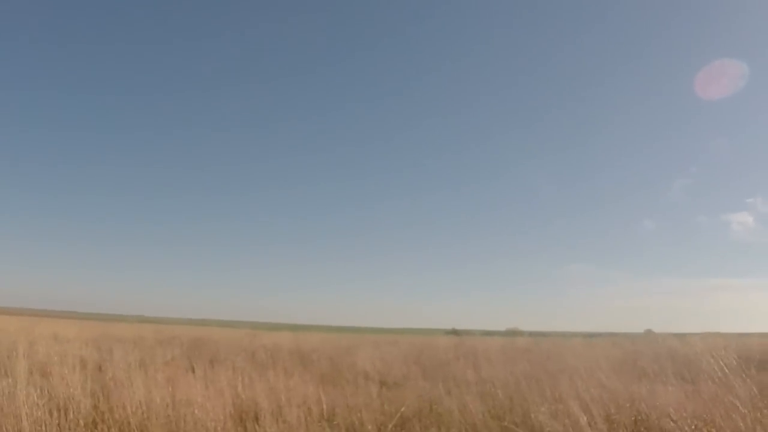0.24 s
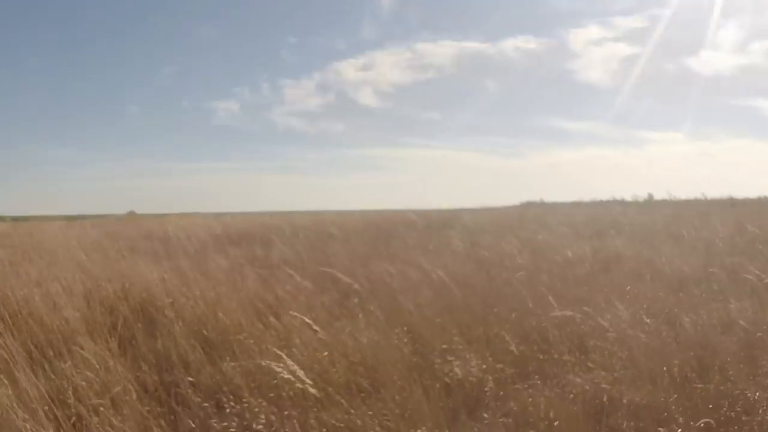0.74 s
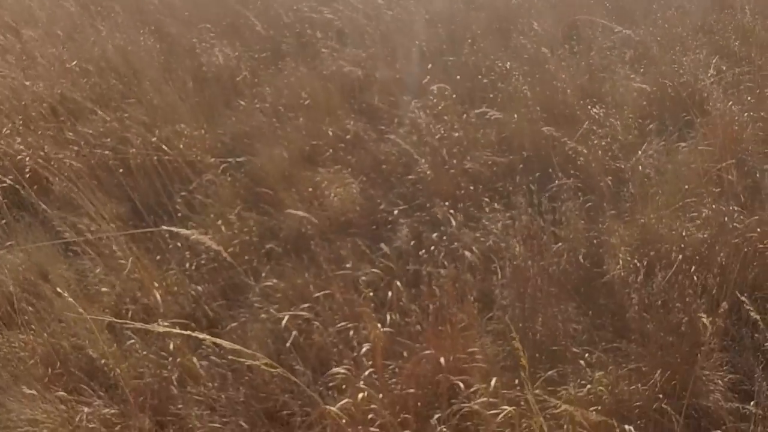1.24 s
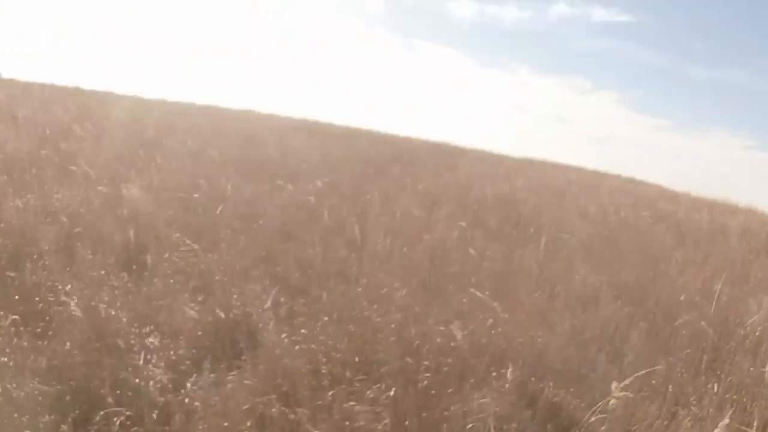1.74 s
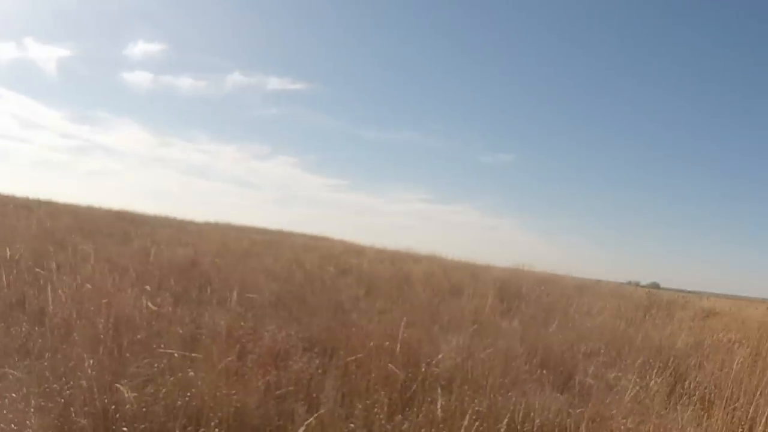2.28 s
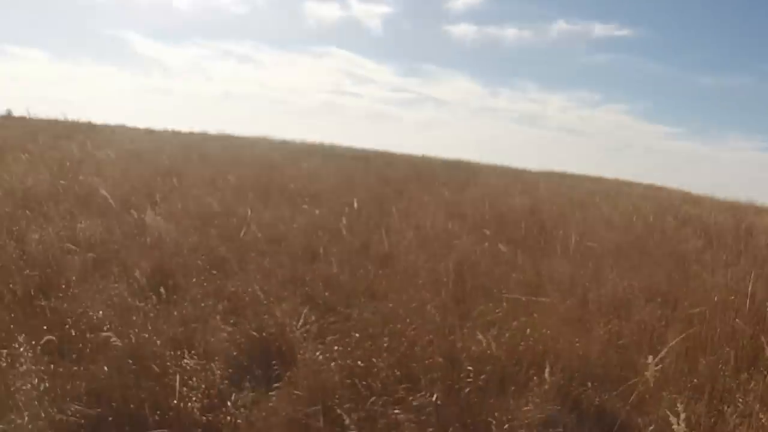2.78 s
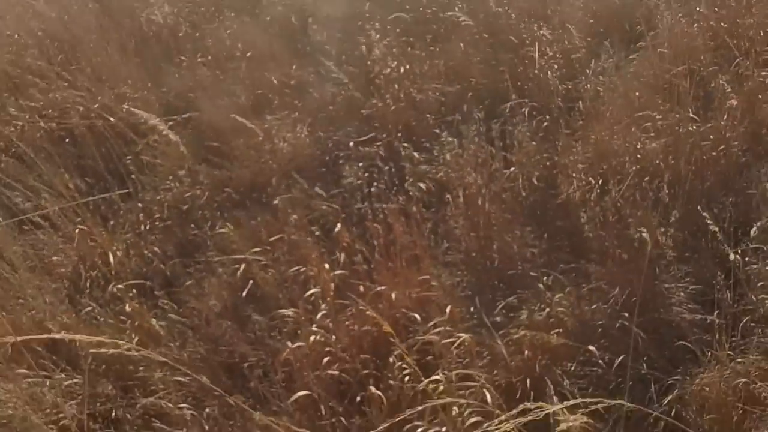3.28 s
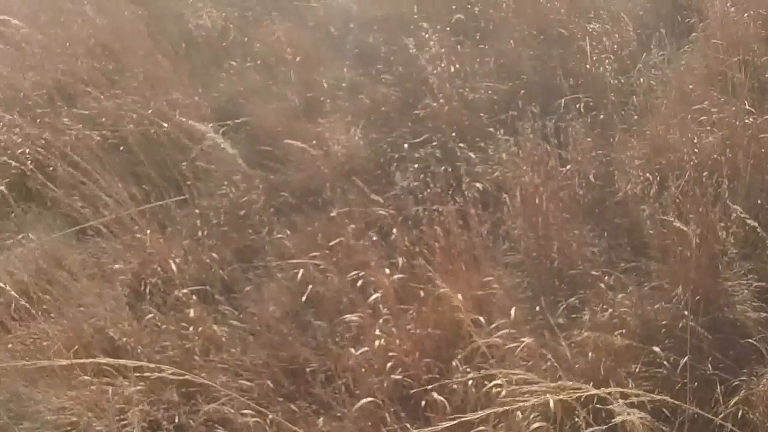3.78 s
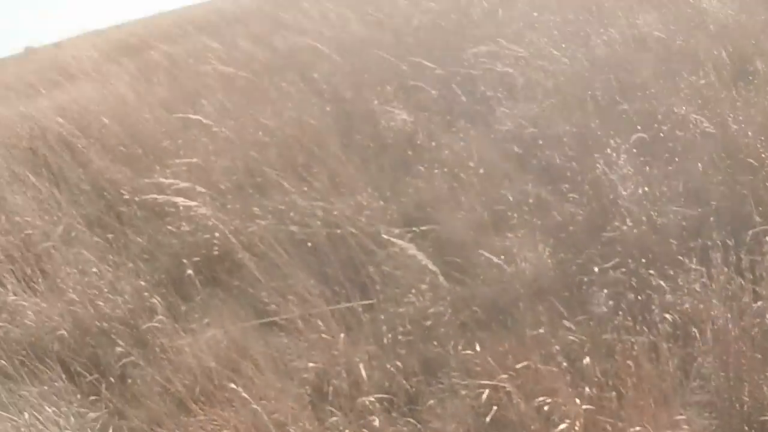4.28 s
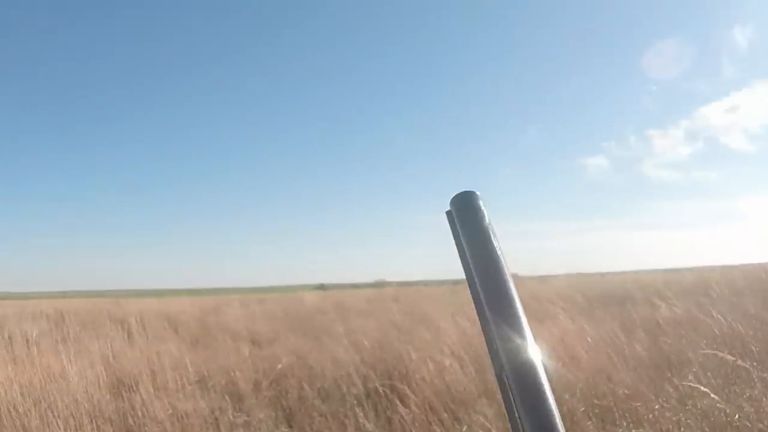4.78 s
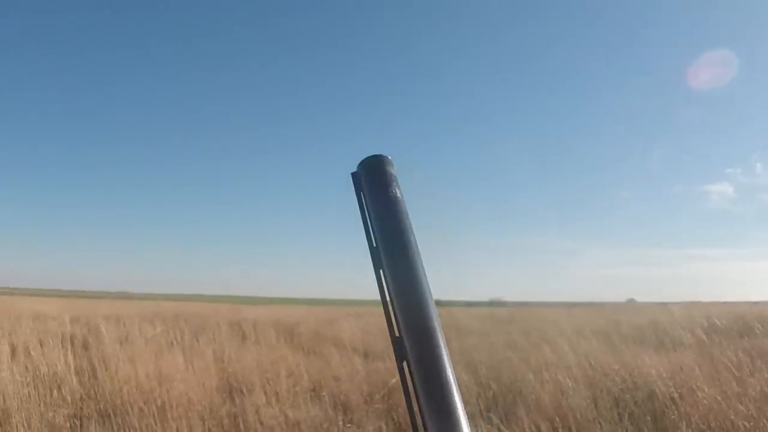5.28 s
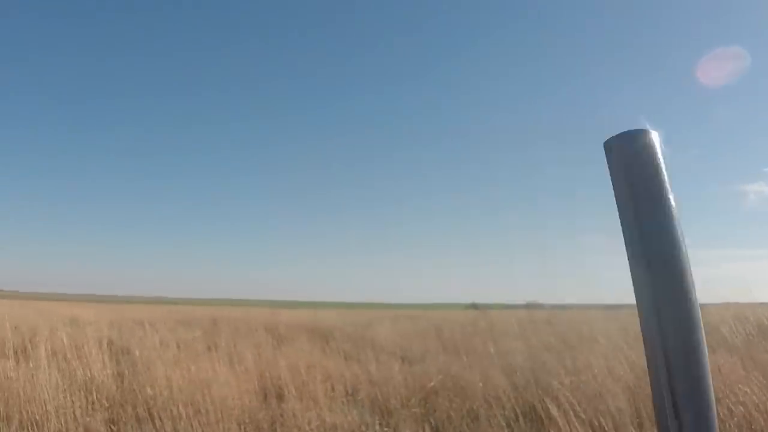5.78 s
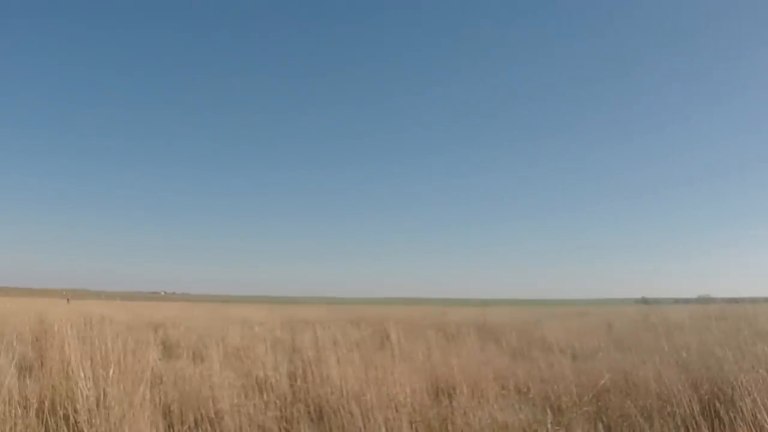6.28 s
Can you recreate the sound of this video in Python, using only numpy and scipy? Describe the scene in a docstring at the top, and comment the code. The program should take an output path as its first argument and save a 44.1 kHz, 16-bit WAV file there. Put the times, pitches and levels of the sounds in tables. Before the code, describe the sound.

A shotgun is loaded close up with steel clicks, a short squeak and a sharp closing snap, over gusty wind and hissing dry grass.

```python
"""Loading a shotgun in windy grass

Someone stands in tall dry grass in an open field and handles a shotgun close to a body-worn camera.
Clothes scuff, a shell scrapes and squeaks into the steel chamber, and the action clicks and snaps shut.
Gusts rumble on the microphone, hiss in the grass and sound a hollow note in the camera housing."""
import sys
import numpy as np
from scipy import signal
from scipy.fft import rfft, irfft
from scipy.io import wavfile
from scipy.ndimage import uniform_filter1d

SR = 44100
rng = np.random.default_rng(int(sys.argv[2]) if len(sys.argv) > 2 else 0)


def store_wav(level_fs):
    """Save 16-bit WAV to argv[1]."""
    pcm = np.round(np.clip(np.atleast_2d(level_fs), -1, 1) * 32767)
    wavfile.write(sys.argv[1], SR, pcm.T.astype(np.int16))


N = 288344
FREQS = np.fft.rfftfreq(N, 1 / SR)

# gusts: crest t/s, length/s, microphone rumble/dB, grass hiss/dB, hollow housing note/dB
GUSTS = [(0.01, 0.18, -54, -60, -64), (0.333, 0.11, -51, -65, -72), (0.703, 0.16, -47, -61.5, -68),
         (0.826, 0.097, -51, -66, -57.5), (1.309, 0.08, -55, -66, -61), (1.467, 0.13, -50, -70, -68),
         (1.697, 0.24, -48, -61.5, -62), (1.979, 0.11, -50, -62, -61), (2.328, 0.13, -52, -60, -54.5),
         (2.631, 0.21, -49, -61, -59), (3.035, 0.084, -48, -66, -56), (3.248, 0.072, -51.5, -83, -77),
         (4.34, 0.11, -62, -66, -73), (4.75, 0.1, -56, -66, -86), (4.992, 0.051, -46.5, -59.5, -64),
         (5.136, 0.053, -54, -61, -59), (5.305, 0.19, -50.5, -57, -60), (5.78, 0.19, -45.5, -59, -61.5),
         (6.037, 0.2, -51.5, -57.5, -59.5), (6.226, 0.18, -41, -56, -60),
         (6.465, 0.17, -45.5, -58.5, -56.5)]
# modes of the steel action and barrel: f/Hz, width/Hz, level/dB
STEEL_MODES = [(1310, 49, -21), (1570, 59, -2.5), (1980, 500, -5.5), (2640, 190, -5.5), (3090, 170, -7),
               (3605, 190, -2.5), (4540, 300, -5.5), (4990, 340, -13.5), (5710, 230, -10),
               (6120, 130, -5.5), (7180, 510, 4), (7830, 110, 5.5), (8540, 180, -12), (8990, 280, -4),
               (9600, 300, -5), (10700, 350, -12), (12600, 1000, -10)]


def amp(db):
    """Decibels to gain."""
    return 10 ** (np.asarray(db) / 20)


def unit(x):
    """Scales to rms 1."""
    return x / np.sqrt(np.mean(abs(x) ** 2) + 1e-20)


def colour(points, hz):
    """Gain of an EQ curve (f/Hz, level/dB) on a log-frequency axis."""
    f, db = np.transpose(points)
    return amp(np.interp(np.log(hz + 1), np.log(f), db))


def peaks(modes, hz):
    """Gain of a bank of resonances."""
    return np.sqrt(sum(amp(db) ** 2 / (1 + ((hz - f) / width) ** 2 * 2) ** 2 for f, width, db in modes))


def noise(gain, size=N):
    """Noise of rms 1 with the given spectrum."""
    return unit(irfft(rfft(rng.standard_normal(size)) * gain, size))


def wander(hz):
    """Random modulation of rms 1, rolling off above hz."""
    return noise(1 / (1 + (FREQS / hz) ** 4))


def steadied(x, seconds):
    """Evens out the slow swells of a noise."""
    power = abs(uniform_filter1d(x ** 2, max(int(seconds * SR), 2)))
    return x / np.sqrt(power + 0.034)


def causal(gain):
    """The minimum-phase spectrum: the quickest ring that has this gain."""
    cepstrum = irfft(np.log(gain + 1e-9))
    half = len(cepstrum) // 2
    return np.exp(rfft(np.r_[cepstrum[0], 2 * cepstrum[1:half], np.zeros(half)]))


def add(mix, s, sound):
    """Mixes a sound in at s seconds."""
    part = mix[max(round(s * SR), 0):][:len(sound)]
    part += sound[:len(part)]


def swells(base, rows, steepness=2.58, linger=1.08):
    """Adds swells (crest t/s, length/s, level/dB) to a gain by power; each falls slower than it rises."""
    power = base ** 2
    for crest, seconds, db in rows:
        start = max(crest - 2 * seconds, 0)
        offset = (np.arange(start, crest + 2 * seconds, 1 / SR) - crest) / (seconds / 2)
        flank = abs(np.where(offset > 0, offset / linger, offset))
        add(power, start, amp(db) ** 2 * np.exp(-flank ** steepness))
    return np.sqrt(power)


def field_air(db=-60, low_cut_hz=180):
    """A steady bed of air over the field."""
    # tone of the air: f/Hz, level/dB
    air_eq = [(59, -26), (100, 1), (159, -4.5), (192, -1.5), (293, -7), (355, -8.5), (420, -10.5),
              (640, -13.5), (697, -14.5), (758, -15), (1690, -22.5), (3610, -25.5), (5870, -28),
              (14200, -41.5), (15500, -54)]
    return amp(db) * noise(colour(air_eq, FREQS) * FREQS ** 2 / (FREQS ** 2 + low_cut_hz ** 2))


def breeze():
    """The breeze between gusts, in dB for every sample, with a lull around 4 s."""
    # breeze envelope: t/s, level/dB
    breakpoints = [(0, -52), (1.1, -56), (1.6, -53.5), (2.9, -53), (3.7, -60.5), (4.2, -63.5), (4.8, -60),
                   (5.1, -48.5), (5.55, -50.5), (6.54, -55.5)]
    return np.interp(np.arange(N) / SR, *np.transpose(breakpoints))


def grass(bed_db, hiss_db=1, fizz_db=-4, ticks_per_s=700, tick_share=0.59):
    """Gusts hiss through dry stalks that tick against each other; strong gusts are brighter."""
    # tone of the dry grass: f/Hz, level/dB
    hiss_eq = [(200, -2), (500, -3), (850, 1.5), (1200, 2.5), (1600, 0), (1950, -2), (2300, 2), (2700, -3),
               (3200, -9.5), (4200, -13), (5500, -17.5), (8000, -35), (16000, -34.5)]
    tone = colour(hiss_eq, FREQS)
    gust = swells(amp(bed_db), [(s, seconds, db) for s, seconds, _, db, _ in GUSTS])
    ticks = (rng.random(N) < ticks_per_s / SR) * rng.standard_normal(N)
    stalks = unit(irfft(rfft(ticks) * tone, N))
    hiss = unit(noise(tone) + tick_share * stalks) * gust
    fizz = noise(peaks([(2400, 500, 6.5), (3700, 840, -4)], FREQS)) * gust ** 2 / gust.max()
    return amp(hiss_db) * hiss + amp(fizz_db) * fizz


def housing_note(bed_db, trim_db=-1):
    """Wind blows a hollow note in the cavity of the camera housing."""
    # cavity modes: f/Hz, width/Hz, level/dB
    cavity_modes = [(1560, 144, 3.5), (1672, 290, 1)]
    blown = swells(amp(bed_db), [(s, seconds, db) for s, seconds, _, _, db in GUSTS])
    return amp(trim_db) * steadied(noise(peaks(cavity_modes, FREQS)), 0.032) * blown


def microphone_wind(buffet_db=1.0, flutter_db=1.0, surge_db=1.74):
    """Eddies on the microphone: slow buffeting under a fluttering rumble."""
    # tone of the sub-bass buffeting and of the rumble: f/Hz, level/dB
    buffet_eq = [(10, -16.5), (22, -8.5), (36, 2), (55, -9.5), (75, -15), (150, -25.5), (400, -75)]
    rumble_eq = [(30, -21), (62, 0), (110, 1), (155, -4), (185, -12.5), (250, -13), (380, -22), (700, -33),
                 (1500, -53), (5000, -74)]
    # large eddies that thump the microphone: crest t/s, length/s, level/dB
    eddies = [(0, 0.035, -39), (0.314, 0.052, -44.5), (0.876, 0.16, -45), (1.166, 0.05, -47),
              (2.04, 0.045, -47), (2.358, 0.19, -45.5), (3.096, 0.036, -42.5), (4.855, 0.16, -43.5),
              (4.994, 0.035, -37), (5.364, 0.054, -40), (6.227, .1, -44), (6.427, 0.061, -47.5)]
    pressure = swells(amp(breeze()), [(s, seconds, db) for s, seconds, db, _, _ in GUSTS])
    pressure *= amp(surge_db * wander(8.6))
    buffet = steadied(noise(colour(buffet_eq, FREQS)), 0.074) * swells(pressure * amp(-2.5), eddies)
    rumble = unit(noise(colour(rumble_eq, FREQS)) * amp(flutter_db * wander(40)))
    return amp(buffet_db) * buffet + steadied(rumble, 0.061) * pressure


def scuff(db, decay, tilt_db, rise=0.0014, grain_db=1.5, size=8192):
    """A short brush of cloth: grainy noise that holds briefly and dies."""
    # tone of rubbing cloth: f/Hz, level/dB
    cloth_eq = [(200, -47), (600, -4), (1200, -7.5), (1550, 4), (2200, 0), (2900, -6.5), (3550, -0.5),
                (4100, -9), (4700, -7), (5600, -18.5), (6500, -15.5), (7400, -38), (16000, -47)]
    t, hz = np.arange(size) / SR, np.fft.rfftfreq(size, 1 / SR)
    rub = noise(colour(cloth_eq, hz) * amp(tilt_db * np.log2((hz + 1) / 2000)), size)
    grain = amp(grain_db * noise(1 / (1 + (hz / 300) ** 2), size))
    envelope = np.minimum(t / rise, 1) / np.sqrt(1 + (t / decay) ** 4)
    return amp(db) * unit(rub * grain) * envelope


def jolt(hz=34.4, db=-30, rise=0.0057, decay=0.0403):
    """The closing action shakes the camera: a few slow swings on its mount."""
    t = np.arange(SR // 2) / SR
    return amp(db) * np.sin(2 * np.pi * hz * t) * (1 - np.exp(-t / rise)) * np.exp(-(t / decay) ** 2)


def slide(seconds, db, pitch_hz, upper_db, scrape_db, waver=0.0071, glide=0.0045, judder_db=1, size=4096):
    """Stick and slip make the chamber squeak, rising slightly, over its upper modes and a dry scrape."""
    # upper modes of the squeak: f/Hz, width/Hz, level/dB
    upper_modes = [(6530, 90, -9.5), (9230, 130, 1), (9900, 400, -13)]
    scrape_eq = [(500, -27), (1500, -9), (5000, 10.5), (7000, -10.5), (13000, -6), (16000, -11)]
    t, hz = np.arange(size) / SR, np.fft.rfftfreq(size, 1 / SR)
    drift, judder = (noise(1 / (1 + (hz / 190) ** 4), size) for _ in range(2))
    bend = 1 + waver * drift + glide * (t / seconds - .5)
    phase = 2 * np.pi * np.cumsum(pitch_hz * bend) / SR
    squeak = unit(np.sin(phase) + amp(-28) * np.sin(2 * phase) + amp(-29) * np.sin(3 * phase))
    upper = steadied(noise(peaks(upper_modes, hz), size), 0.012)
    scrape = noise((peaks(STEEL_MODES, hz) + 0.29) * colour(scrape_eq, hz), size)
    stroke = signal.windows.tukey(min(int(seconds * SR), size), .8)
    sound = (squeak + amp(upper_db) * upper + amp(scrape_db) * scrape) * amp(judder_db * judder)
    return amp(db) * stroke * sound[:len(stroke)]


def rattle(seconds, db, sizzle_db, per_s=170, jitter=0.75, notes_hz=(3000, 5240), spread_db=3):
    """A quick, uneven run of light contacts between loose parts."""
    out = np.zeros(SR // 4)
    contacts = rng.uniform(-1, 1, (max(round(seconds * per_s), 1), 3))
    for k, (late, note, softness) in enumerate(contacts):
        note_hz = np.interp(note, [-1, 1], notes_hz)
        tick = click(note_hz, db - spread_db * softness, ring_db=0, sizzle_db=sizzle_db, decay=.002)
        add(out, (k + jitter * late) / per_s, tick)
    return out


def click(note_hz, db, ring_db, sizzle_db, decay,
          rise=0.00074, tail=0.015, tail_db=-31, lag=0.001227, size=4096):
    """Steel parts chatter for a few milliseconds and ring the action; the treble arrives first."""
    t, hz = np.arange(size) / SR, np.fft.rfftfreq(size, 1 / SR)
    envelope = (1 - np.exp(-t / rise)) * (np.exp(-(t / decay) ** 1.45) + amp(tail_db) * np.exp(-t / tail))
    chatter = rfft(rng.standard_normal(size) * envelope)
    chatter *= causal(uniform_filter1d(abs(chatter) ** 2, size=60) ** -.5)  # flattened, so unpitched
    modes = STEEL_MODES + [(note_hz, 170, 8)]  # the struck part adds its own note
    ring = chatter * causal(peaks(modes, hz) + amp(-16))
    knock_db = -6.5 * np.log2(note_hz / 1900)  # higher-pitched parts knock less
    snap_db = 0.28 * sizzle_db
    contact_eq = [(150, knock_db - 30), (900, knock_db - 10.5), (1400, knock_db), (2000, knock_db),
                  (2700, 0), (3900, 0), (4500, ring_db), (5200, ring_db), (6200, snap_db - 1.5),
                  (9400, snap_db - 6.5), (11000, sizzle_db + 0.5), (15000, sizzle_db - 10)]
    broad = np.sqrt(uniform_filter1d(abs(ring) ** 2, size=170))
    ring *= causal(colour(contact_eq, hz) / broad)  # the contact, not the modes, sets the broad colour
    delay = lag / (1 + (hz / 3000) ** 2)  # bending waves: low notes travel slower
    sound = irfft(ring * np.exp(-2j * np.pi * np.cumsum(delay) * SR / size))
    return amp(db) * sound[:size // 2]


def widen(mix, delay=.007):
    """Centres the mix, with a trace of stereo width above the bass."""
    # side against centre: f/Hz, level/dB
    side_eq = [(30, -61.5), (150, -42.5), (500, -39), (4000, -33), (14000, -25)]
    side = np.zeros(N)
    add(side, delay, irfft(rfft(mix) * colour(side_eq, FREQS), N))
    return np.array([mix + side, mix - side])


def scene(breeze_follow=.52, flutter_db=1.97, slide_trim_db=1):
    """Lays the cloth and gun foley over the wind bed."""
    # clothes and stalks brushing: t/s, level/dB, decay/s, tilt/(dB per octave)
    scuffs = [(.134, -58, 0.013, 7), (.629, -54, 0.018, 5), (.836, -56, 0.02, -3.5),
              (.981, -44, 0.022, 0.5), (1.455, -54, 0.021, 0.5), (1.7496, -42.5, 0.017, -0.8),
              (1.938, -55, 0.013, -5), (1.973, -52.5, 0.0082, -2.5), (2.654, -61, .03, 2),
              (3.177, -57, 0.026, -0.5), (3.833, -58, 0.022, 3), (4.985, -52, 0.038, -1.5),
              (6.102, -56, 0.055, -1)]
    # metal contacts: t/s, note f/Hz, level near 3 kHz/dB, relative ring near 5 kHz/dB,
    # relative sizzle above 10 kHz/dB, chatter decay/s
    clicks = [(1.548, 4700, -25.5, 2, -33, .0024), (1.797, 1640, -21, 6, -30, 0.0032),
              (1.8243, 5100, -20, 8, -7, 0.0015), (2.106, 4740, -27.5, 3, -15, 0.0022),
              (2.211, 3540, -15, -9, -12, 0.004), (2.223, 4970, -8.5, -4, -29, .0017),
              (2.229, 1580, -19, -7, -9, 0.0016), (2.2478, 5060, -13, 0.5, -17, 0.0018),
              (2.344, 1290, -9, 2, -2, 0.0023), (2.3472, 1860, -8.5, 5.5, -4, 0.0012),
              (2.512, 3550, -19, 2.5, -16, 0.0038), (2.544, 1420, -12, 2.5, -8, 0.0035),
              (4.37, 4500, -25.5, 4, -26, .0024), (4.3853, 4860, -24, 10, -10, .0011),
              (4.3974, 4960, -11.5, 8, -16, 0.0026), (4.508, 2530, -23, -4, -37, .002),
              (4.6923, 3700, -12, 1.5, -23, 0.0026), (4.763, 2170, -12.5, -7, -21, .002),
              (4.777, 3190, -12, 3, -12, 0.00089), (4.834, 5130, -16, 6, -15, 0.014),
              (4.843, 3450, 3, 2, -19.5, 0.0035), (5.041, 2310, -12.5, 3, -22, 0.0054),
              (5.076, 2730, -6.5, -3, -21.5, 0.0034)]
    # metal sliding on metal: t/s, length/s, level/dB, squeak f/Hz,
    # relative upper modes/dB, relative scrape/dB
    slides = [(1.798, 0.014, -61, 4800, -20, -10), (2.268, 0.039, -49.5, 4680, -7.5, 0),
              (2.298, 0.033, -45, 4830, 0.5, -3.5), (2.329, 0.019, -54, 4700, -8, 2),
              (2.347, 0.023, -34.5, 4960, -12.5, -14), (2.367, 0.011, -51, 4730, -23, -16),
              (4.387, 0.021, -49, 4700, -21, -0.5), (4.804, 0.03, -50.5, 5160, -22, -0.5)]
    # loose parts rattling after a contact: t/s, length/s, level/dB, relative sizzle/dB
    rattles = [(2.219, .06, -29, -11), (4.395, .024, -29, -18), (4.702, .014, -16.5, -25)]
    mix = microphone_wind()
    bed_db = breeze_follow * breeze()  # hiss and hollow note swing less than the rumble
    rustle = grass(bed_db - 42) + housing_note(bed_db - 47)
    mix += field_air()
    mix += rustle * amp(flutter_db * wander(35))
    for s, *row in scuffs:
        add(mix, s, scuff(*row))
    for s, *row in clicks:
        add(mix, s, click(*row))
    for s, *row in slides:
        add(mix, s, amp(slide_trim_db) * slide(*row))
    for s, *row in rattles:
        add(mix, s, rattle(*row))
    add(mix, 4.862, jolt())  # just after the action snaps shut
    return widen(mix)


def record(dry, cutoff_hz=15600):
    """A steep low-pass takes off the very top."""
    taps = signal.firwin(511, cutoff_hz, window=("kaiser", 9), fs=SR)
    return signal.oaconvolve(dry, taps[None], "same", axes=1)


dry = scene()
out = record(dry)
store_wav(out)
```